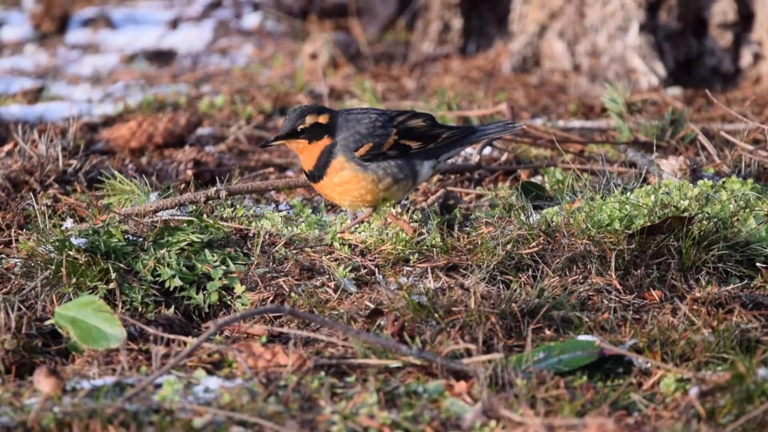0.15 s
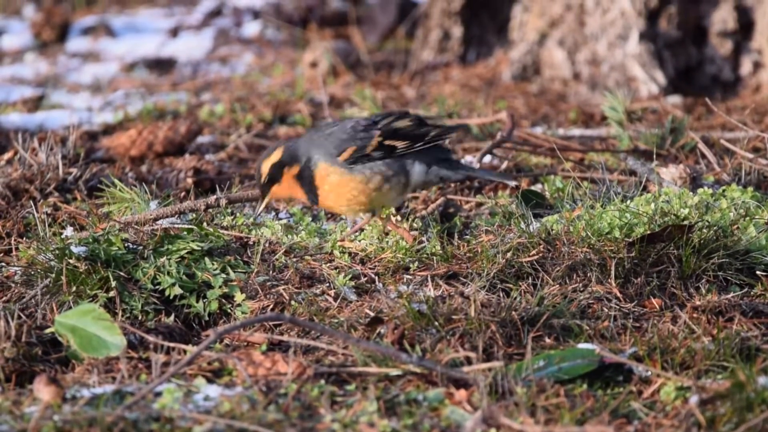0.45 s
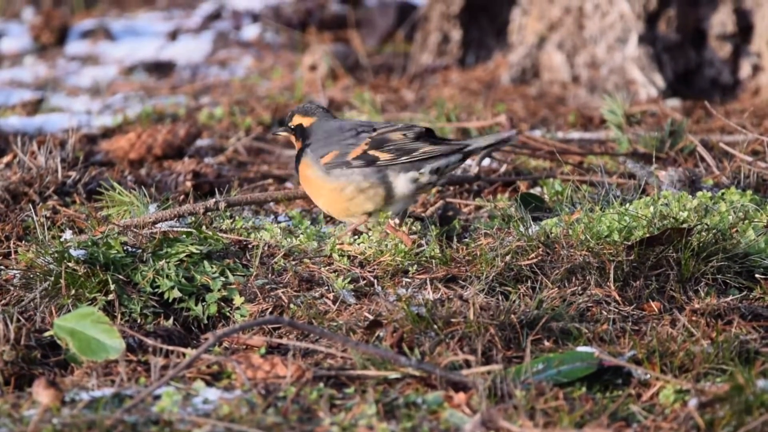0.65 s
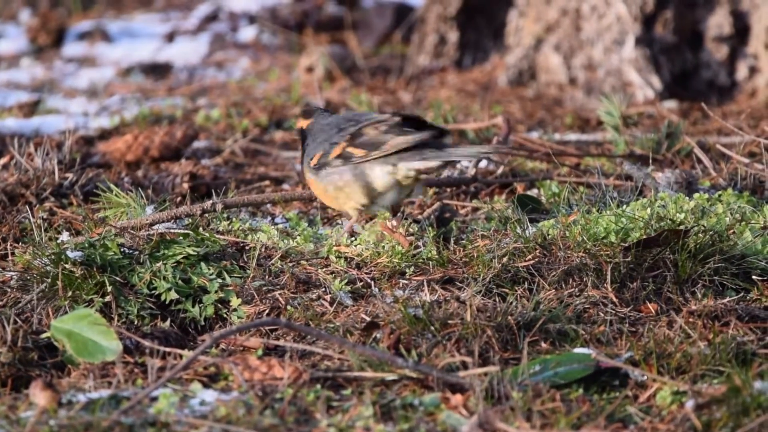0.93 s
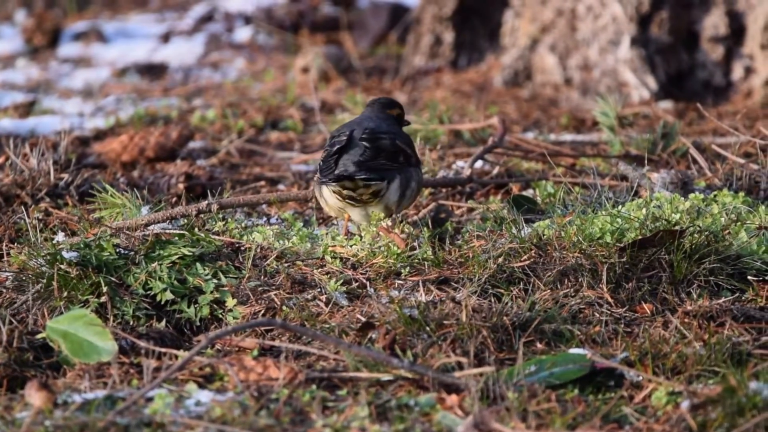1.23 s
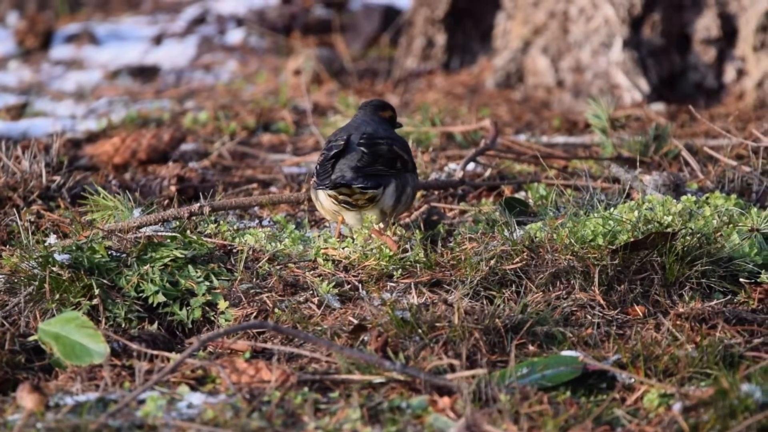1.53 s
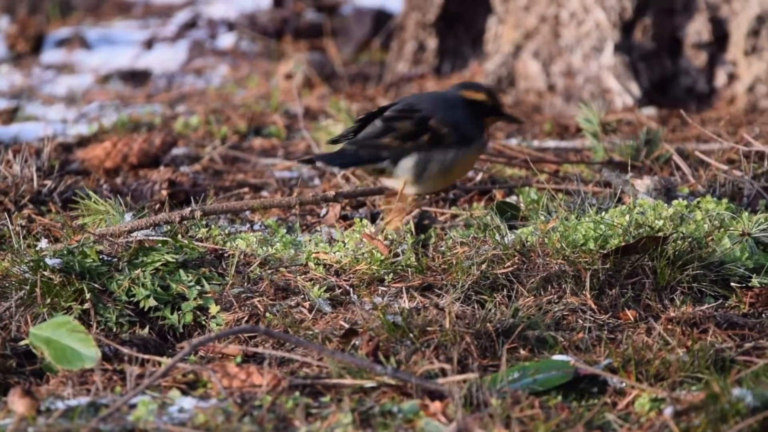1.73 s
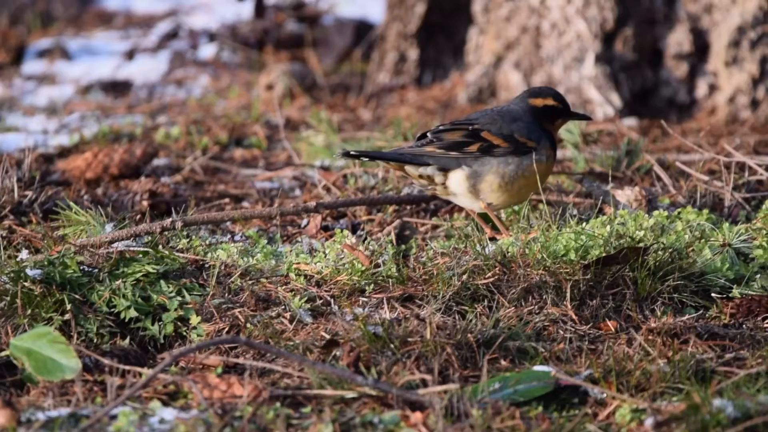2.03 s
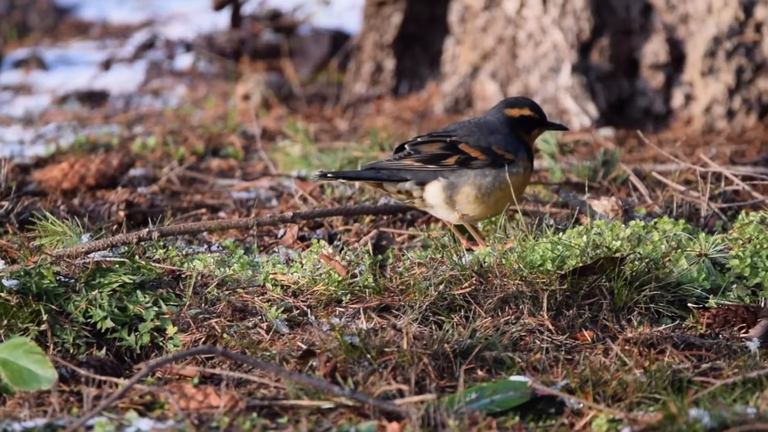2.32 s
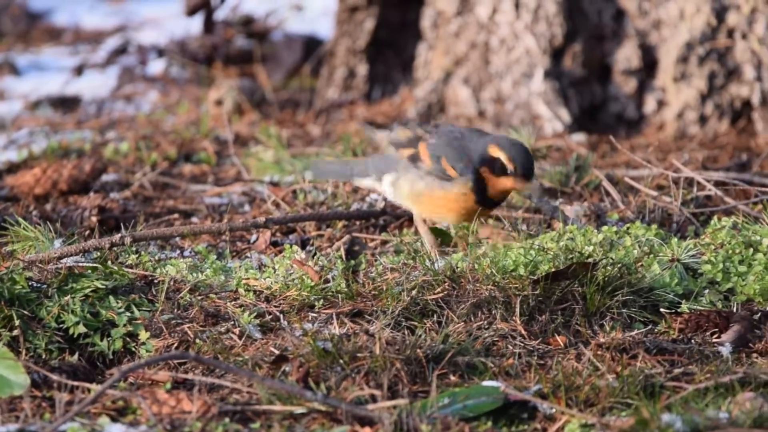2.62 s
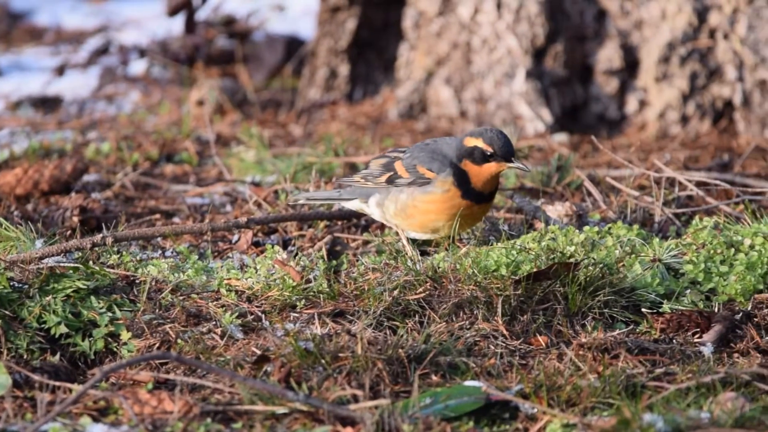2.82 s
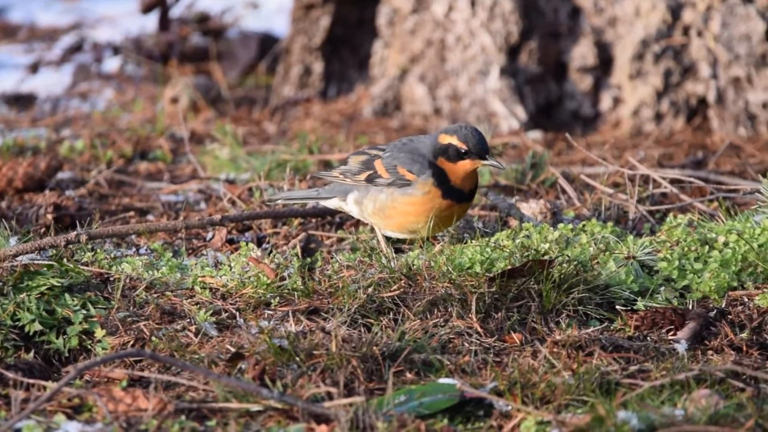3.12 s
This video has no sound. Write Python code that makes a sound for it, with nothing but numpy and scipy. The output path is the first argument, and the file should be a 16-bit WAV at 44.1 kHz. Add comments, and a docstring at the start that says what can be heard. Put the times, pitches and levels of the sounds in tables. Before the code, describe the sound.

A crow caws twice some way off, at about 2.4 and 2.9 seconds, harsh and lightly echoing among trees, the second a little louder. A steady distant wash and faint low rumble run throughout. Close by, a small bird faintly ticks and rustles in dry needles around 1, 2 and 2.5 seconds, with one tiny high pip near 2. Soft microphone bumps recur, with dull knocks at 1.4, 2.5 and 3.

```python
"""Crow among trees

A crow caws twice some way off: uneven pulses ring its throat, and trunks scatter the sound.
Close by, a small foraging bird ticks and rustles in the litter, and one thin pip sounds.
Soft bumps and knocks reach the microphone over a low rumble and a wash of distant outdoor noise."""
import sys
import numpy as np
from scipy import signal
from scipy.io import wavfile
from scipy.ndimage import uniform_filter1d

SR = 44100
rng = np.random.default_rng(int(sys.argv[2]) if len(sys.argv) > 2 else 0)


def wav_record(signal):
    """Record a signal, one row per channel, as 16-bit PCM in the file named by sys.argv[1]."""
    frames = np.transpose(np.atleast_2d(signal))
    bounded = np.clip(frames, -1, 1)
    # unit amplitude maps onto the largest positive 16-bit level
    quanta = np.round(bounded * 32767).astype(np.int16)
    wavfile.write(sys.argv[1], SR, quanta)


N = 143766

# Caws. Each row: start in seconds, length in seconds, source level in dB, pitch before scoop and sag
# in Hz, fade in dB/s, pulse jitter as a share of a period.
CROW_CAWS = [(2.399, .243, -39, 230.9, 10.5, 0.04), (2.903, .243, -36, 235.7, 24.5, .024)]
# Throat resonances. Each row: mid-caw centre in Hz, width in Hz, relative level in dB,
# fade in dB/s as the beak closes.
THROAT_MODES = [(1431, 215, 1, -4), (1670, 230, -2, 17), (2100, 290, -3.5, 23), (1197, 167, -7.5, 0.5)]
# Litter ticks. Each row: centre in seconds, level in dB.
LITTER_TICKS = [(.961, -63), (1.895, -67), (2.063, -63), (2.073, -60.5), (2.111, -59), (2.522, -60),
                (2.552, -60), (2.572, -62), (2.587, -66), (2.643, -59)]
# Needle rustles. Each row: centre in seconds, half length in seconds, level in dB, band centre in Hz.
NEEDLE_RUSTLES = [(0.863, 0.027, -64, 4000), (1.018, .06, -73, 5000), (2.08, .015, -66, 4870),
                  (2.573, 0.051, -71, 8100)]
# Microphone bumps. Each row: centre in seconds, half length in seconds, level in dB, band centre in Hz.
MIC_BUMPS = [(0.077, 0.047, -49.5, 123), (0.13, 0.0092, -53.5, 247), (0.269, 0.014, -56, 106),
             (0.489, 0.013, -59, 129), (0.548, 0.016, -54, 76), (0.745, 0.012, -57.5, 84),
             (.8, .015, -58.5, 80), (1.265, 0.022, -55, 71), (1.43, 0.037, -53.5, 82),
             (1.632, .02, -51, 73), (1.779, 0.009, -52, 84), (2.513, 0.031, -52, 118),
             (2.541, 0.0044, -49.5, 340), (2.825, 0.039, -53, 77), (2.932, 0.052, -51.5, 83.6),
             (2.971, 0.011, -47.5, 175), (3.118, 0.017, -55, 71.6)]
# Camera body knocks. Each row: start in seconds, envelope peak in dB, frequency in Hz.
BODY_KNOCKS = [(1.388, -44, 108), (2.537, -42.5, 210), (2.964, -36, 86), (2.974, -38, 110)]
# Wash spectrum. Each row: frequency in Hz, relative spectral density in dB.
WASH_SPECTRUM = [(200, -14), (300, -12), (420, -8.5), (570, -8.5), (800, -2.5), (1250, 0), (2000, -3),
                 (2600, -8.5), (3600, -13), (5200, -18), (7000, -24), (10000, -28), (15500, -37)]
# Wash swell. Each row: time in seconds, level in dB.
WASH_SWELL = [(0.0, -51), (0.16, -51.5), (0.42, -51.5), (0.52, -53), (0.78, -49.5), (2.37, -51),
              (2.38, -50.5)]
# Rumble spectrum. Each row: frequency in Hz, relative spectral density in dB.
RUMBLE_SPECTRUM = [(25, 0), (50, -7.5), (80, 4.5), (125, -11.5), (200, -11.5), (300, -30)]
# Stereo image of wash and rumble. Each row: frequency in Hz, left-right coherence from 0 to 1.
STEREO_COHERENCE = [(100, 0.93), (300, 0.9), (1200, 1), (2000, 0.98), (3000, 0.69), (5000, 0.45),
                    (8000, 0.36), (14000, 0.079)]

ATTACK_S, RELEASE_S = .026, .025
SCOOP_OCTAVES, SCOOP_S, SAG_OCTAVES = .28, .015, .27
PULSE_SPREAD_DB, RASP_GAIN, RASP_DECAY_S = 1.1, .079, .0018
THROAT_SAG_PER_S, VOICE_LOW_HZ, VOICE_HIGH_HZ = .22, 1050, 2390


def from_db(db):
    """Decibels to gain."""
    return 10 ** (np.asarray(db) / 20)


def unit_rms(x):
    """Scale to rms 1."""
    return x / np.sqrt(np.mean(x ** 2) + 1e-20)


def seconds():
    """Time of every sample."""
    return np.arange(N) / SR


def swell(centre_s, half_s):
    """Gaussian envelope, peak 1."""
    return np.exp(-.5 * ((seconds() - centre_s) / half_s) ** 2)


def band(x, low_hz, high_hz, order=2):
    """Butterworth band-pass."""
    sos = signal.butter(order, [low_hz, min(high_hz, SR / 2 - 100)], "band", fs=SR, output="sos")
    return signal.sosfilt(sos, x + 1e-18)


def drift(rate_hz):
    """Slow random wander, rms about 1."""
    r = np.exp(-80 * np.pi * rate_hz / SR)
    slow = signal.lfilter([1], [1, -2 * r, r * r], rng.standard_normal(N // 40 + 2002))[2000:]
    return np.interp(np.arange(N) / 40, np.arange(len(slow)), unit_rms(slow))


def at_hz(points, hz):
    """Interpolate a table on a log-frequency axis."""
    freqs_hz, values = np.transpose(points)
    return np.interp(np.log(hz), np.log(freqs_hz), values)


def resonate(x, hz, width_hz):
    """Double-pole resonance with a moving centre."""
    turn = np.exp(2j * np.pi * np.cumsum(hz) / SR)
    r = np.exp(-np.pi * width_hz / SR)
    return (turn * signal.lfilter([(1 - r) ** 2], [1, -2 * r, r * r], x / turn + 1e-18)).real


def banded_noise(spectrum, flicker_db):
    """Stereo noise in third-octave bands, each flickering on its own; rms 1."""
    edges_hz = 1000 * 2 ** (np.arange(-17, 14) / 3)
    out, white = 0, rng.standard_normal((2, 2, N))
    for k, (low, high) in enumerate(zip(edges_hz, edges_hz[1:])):
        hz, flicker = np.sqrt(low * high), drift(9)
        if high < spectrum[0][0] or low > spectrum[-1][0]:
            continue
        mid, side = band(white[k % 2], low, high, order=3)
        coherence = at_hz(STEREO_COHERENCE, hz)
        stereo = np.sqrt(1 + coherence) * mid + np.sqrt(1 - coherence) * side * [[1], [-1]]
        out = out + from_db(at_hz(spectrum, hz) + flicker_db * flicker) * stereo
    return unit_rms(out)


def crow(tail_db=-8):
    """Caws scattered by trunks, with a faint forest tail; slightly to the right."""
    voice = trunks(sum(caw(*row) for row in CROW_CAWS))
    heard = voice + from_db(tail_db) * forest_echoes(voice)
    return heard * from_db([[-2.3], [-1.5]])


def caw(start_s, length_s, level_db, pitch_hz, fade_db_per_s, jitter):
    """Uneven, raspy pulses ring the throat; pitch scoops up, then sags ever faster."""
    t = seconds() - start_s
    age_s = np.clip(t, 0, length_s + RELEASE_S)
    octaves = -SCOOP_OCTAVES * np.exp(-age_s / SCOOP_S) - SAG_OCTAVES * (age_s / length_s) ** 2
    cycles = np.cumsum(pitch_hz * 2 ** octaves * (t > 0)) / SR
    slip, size = rng.standard_normal((2, 100))
    pulse_samples = np.searchsorted(cycles, np.arange(len(slip)) + .5 + jitter * slip)
    pulses = np.bincount(pulse_samples, from_db(PULSE_SPREAD_DB * size), N + 1)[:N]
    puffs = signal.lfilter([1], [1, -np.exp(-1 / (RASP_DECAY_S * SR))], pulses + 1e-18)
    rasp = RASP_GAIN * puffs * rng.standard_normal(N) / 2
    voice = throat(pulses + rasp, age_s, length_s)
    envelope = np.clip(t / ATTACK_S, 0, 1) * np.clip(1 - (t - length_s) / RELEASE_S, 0, 1)
    return voice * envelope * from_db(level_db - fade_db_per_s * age_s)


def throat(source, age_s, length_s):
    """Resonances sink, the upper ones fading as the beak closes; output levelled to rms 1."""
    sink = 1 - THROAT_SAG_PER_S * (age_s - length_s / 2)
    voice = 0
    for k, (hz, width_hz, db, fade_db_per_s) in enumerate(THROAT_MODES):
        gain = (-1) ** k * from_db(db - fade_db_per_s * age_s)
        voice = voice + gain * resonate(source, hz * sink, width_hz)
    voice = band(voice, VOICE_LOW_HZ, VOICE_HIGH_HZ, order=3)
    return voice / np.sqrt(np.abs(uniform_filter1d(voice ** 2, size=600)) + 1e-12)


def trunks(x, delays_s=(.001308, .0031, .0059), reflection=.42):
    """Quick reflections off nearby trunks smear pulses without colouring them (all-pass)."""
    for delay_s in delays_s:
        loop = np.r_[1, np.zeros(int(delay_s * SR)), reflection]
        x = signal.lfilter(loop[::-1], loop, x + 1e-18)
    return x


def forest_echoes(x, t60_s=.91, count=900, width=.083):
    """Scattered, decaying reflections, slightly different at each ear."""
    delays_s = rng.random(count) * t60_s
    mid, side = rng.choice([-1, 1], count), rng.standard_normal(count)
    decay = from_db(-60 * delays_s / t60_s)
    out = []
    for sign in (1, -1):
        response = np.bincount((delays_s * SR).astype(int), (mid + sign * width * side) * decay)
        out.append(signal.fftconvolve(x, response / np.linalg.norm(response))[:N])
    return np.array(out)


def litter(tick_spread_s=.0037, tick_band_hz=(4200, 11000), grain_db=4, edge_ratio=1.15):
    """Dry needles tick and rustle in grainy patches as a small bird forages."""
    t = seconds()
    bursts = sum(from_db(db) * np.exp(-np.abs(t - s) / tick_spread_s) for s, db in LITTER_TICKS)
    out = bursts * unit_rms(band(rng.standard_normal((2, N)), *tick_band_hz))
    for centre_s, half_s, db, hz in NEEDLE_RUSTLES:
        grains = rng.standard_normal((2, N)) * from_db(grain_db * drift(120))
        rustle = unit_rms(band(grains, hz / edge_ratio, hz * edge_ratio))
        out = out + from_db(db) * swell(centre_s, half_s) * rustle
    return out


def pip(centre_s=1.962, half_s=.01, pitch_hz=6100, waver_hz=90, peak_db=-64.5):
    """A small bird gives one thin, wavering note."""
    cycles = np.cumsum(pitch_hz + waver_hz * drift(100)) / SR
    return from_db(peak_db) * swell(centre_s, half_s) * np.sin(2 * np.pi * cycles)


def bumps(width=.16):
    """Soft bumps on the microphone: short swells of low noise."""
    out = 0
    for centre_s, half_s, db, hz in MIC_BUMPS:
        envelope = swell(centre_s, half_s)
        mid, side = envelope * band(rng.standard_normal((2, N)), hz / 1.35, hz * 1.26)
        lump = unit_rms(mid) + width * unit_rms(side) * [[1], [-1]]
        out = out + from_db(db) * lump * np.sqrt(np.mean(envelope ** 2))
    return out


def knocks(rise_cycles=.41):
    """Dull knocks on the camera body: heavily damped low sines."""
    out = 0
    for start_s, db, hz in BODY_KNOCKS:
        cycles = np.maximum(seconds() - start_s, 0) * hz
        envelope = cycles / rise_cycles * np.exp(1 - cycles / rise_cycles)
        out = out - from_db(db) * envelope * np.sin(2 * np.pi * cycles)
    return out


def wash(end_db=-52):
    """Far-off broad noise that swells gently."""
    times_s, db = np.transpose(list(WASH_SWELL) + [(N / SR, end_db)])
    return from_db(np.interp(seconds(), times_s, db)) * banded_noise(WASH_SPECTRUM, flicker_db=1)


def rumble(level_db=-66.5):
    """Faint, lumpy low noise."""
    return from_db(level_db) * banded_noise(RUMBLE_SPECTRUM, flicker_db=1.5)


def scene():
    """Everything at the microphone."""
    return crow() + wash() + bumps() + knocks() + rumble() + litter() + pip()


def record(dry):
    """The recorder cuts the top and adds a small DC bias."""
    cutoff_hz, bias = 15700, -.003
    return bias + signal.sosfilt(signal.ellip(12, .1, 70, cutoff_hz, fs=SR, output="sos"), dry)


dry = scene()
out = record(dry)
wav_record(out)
```